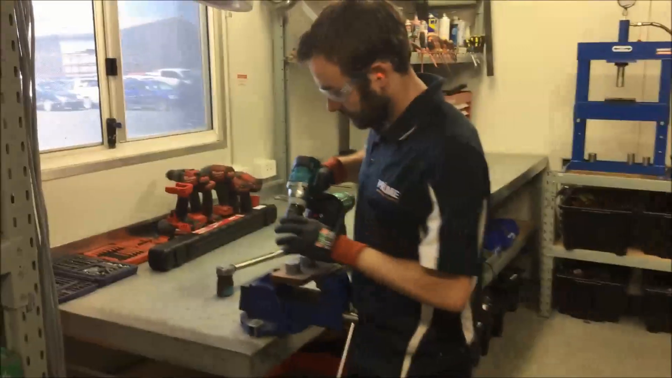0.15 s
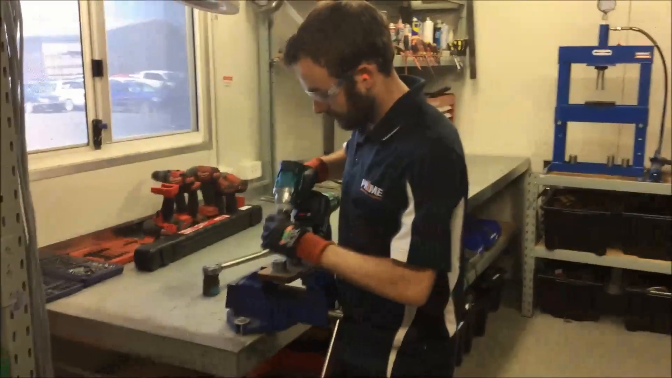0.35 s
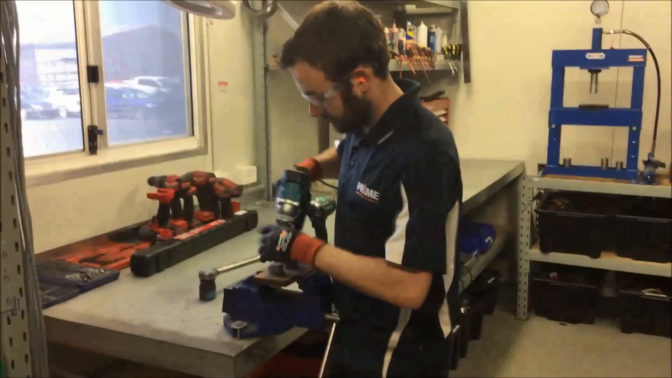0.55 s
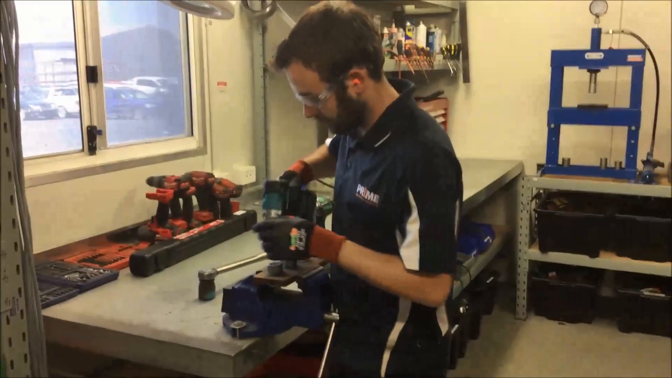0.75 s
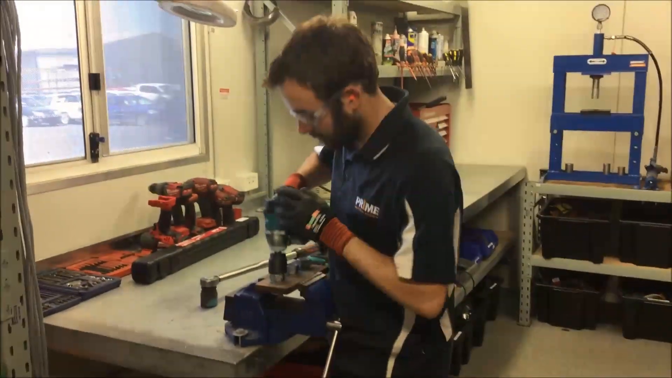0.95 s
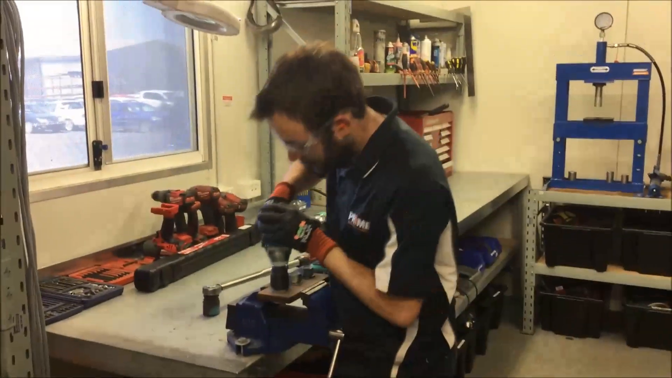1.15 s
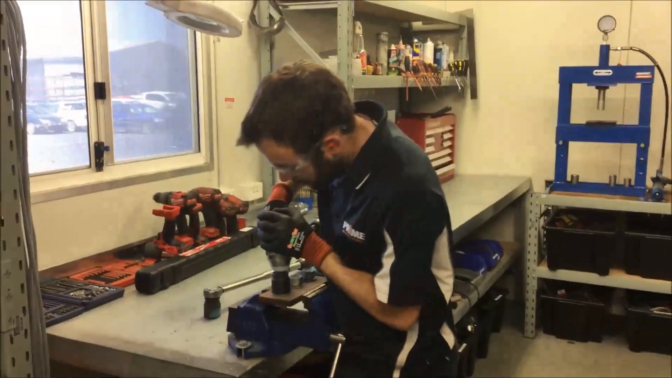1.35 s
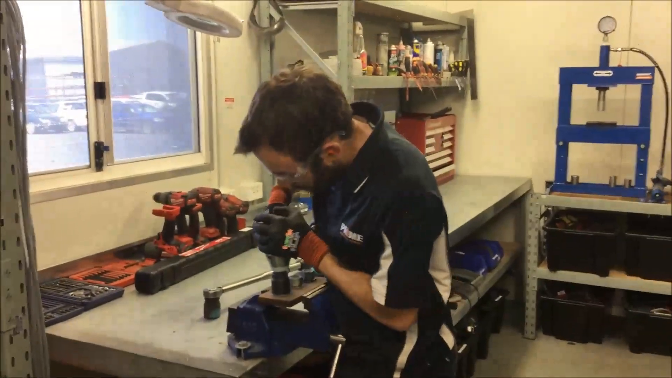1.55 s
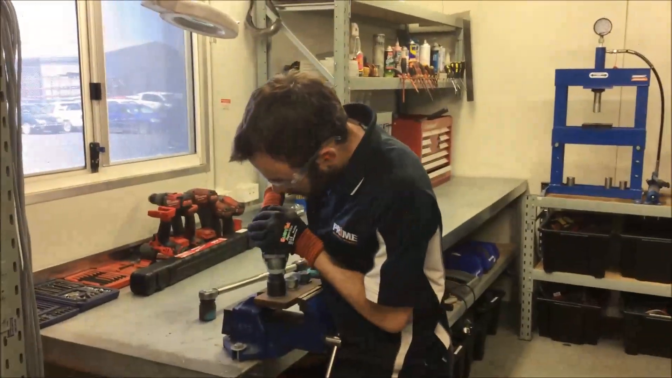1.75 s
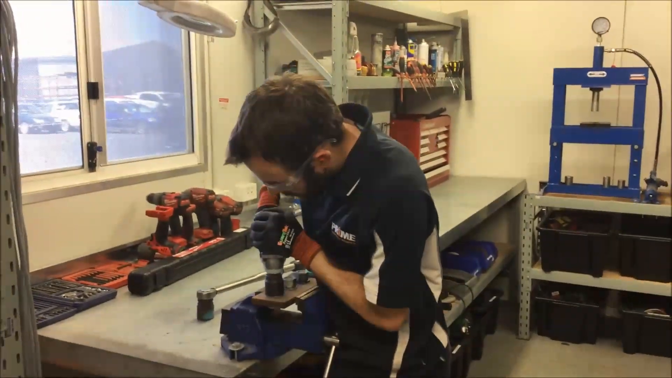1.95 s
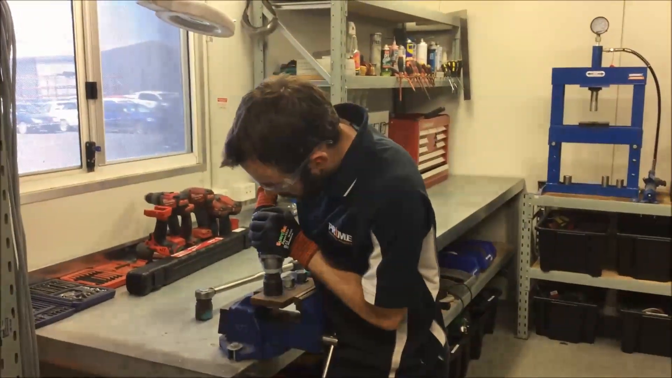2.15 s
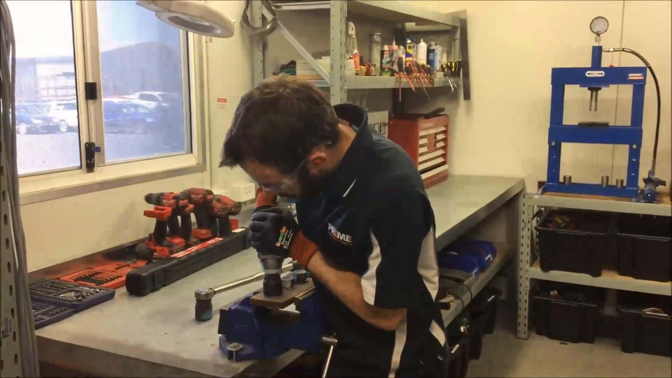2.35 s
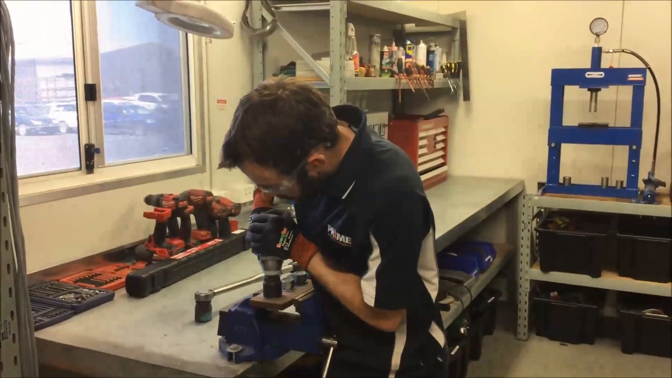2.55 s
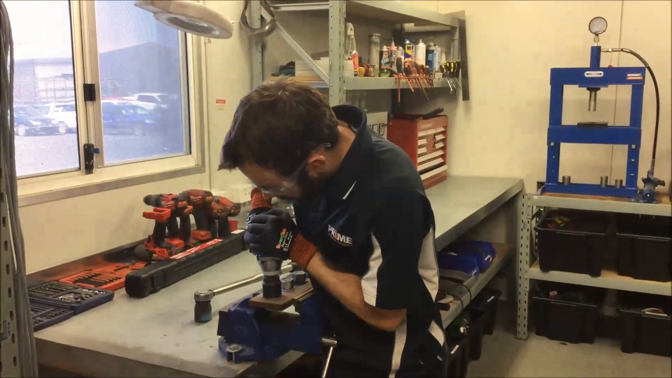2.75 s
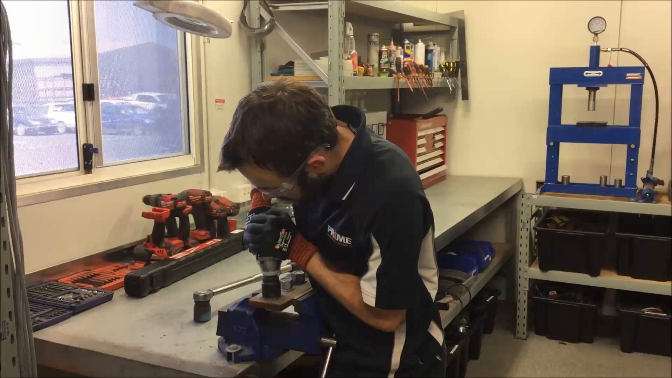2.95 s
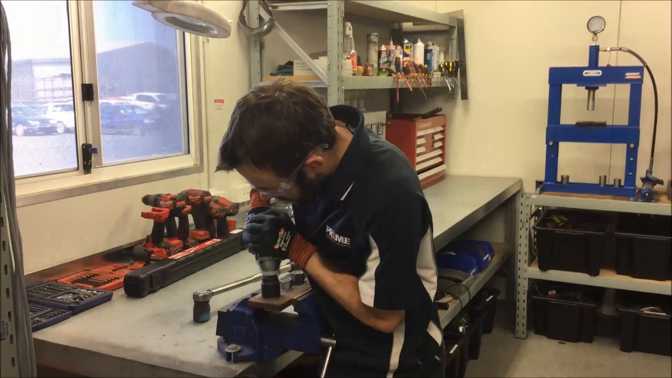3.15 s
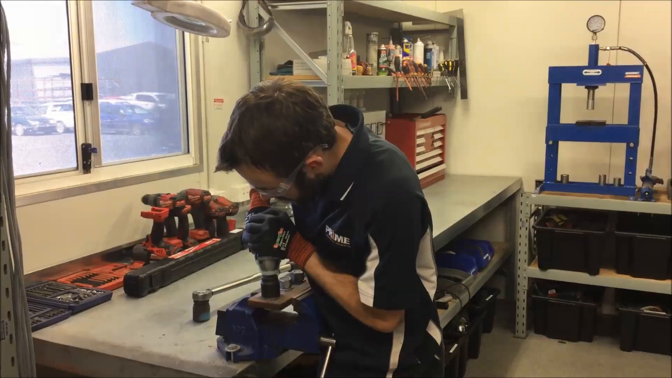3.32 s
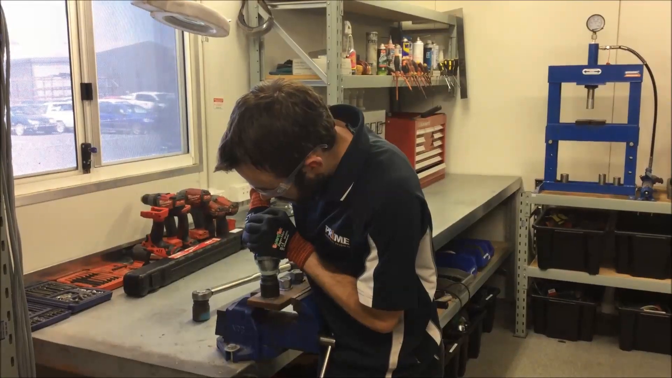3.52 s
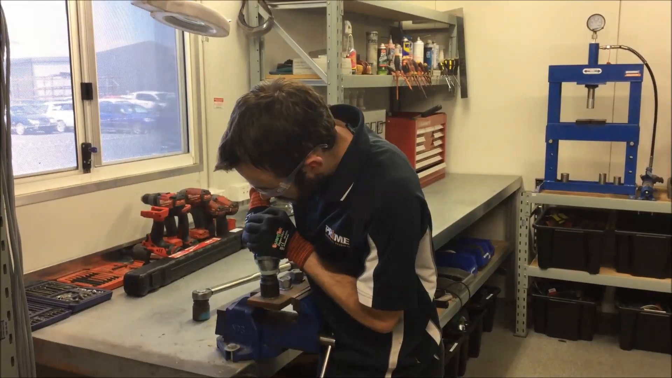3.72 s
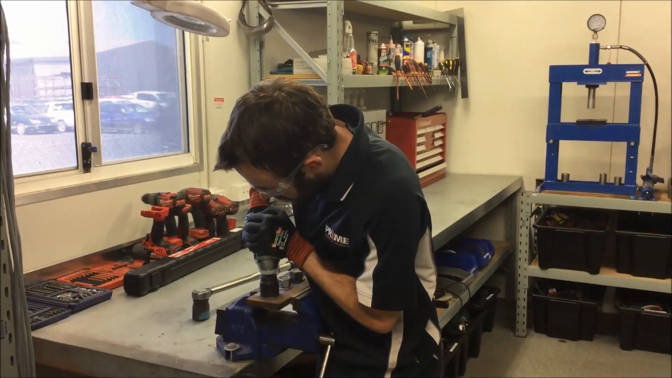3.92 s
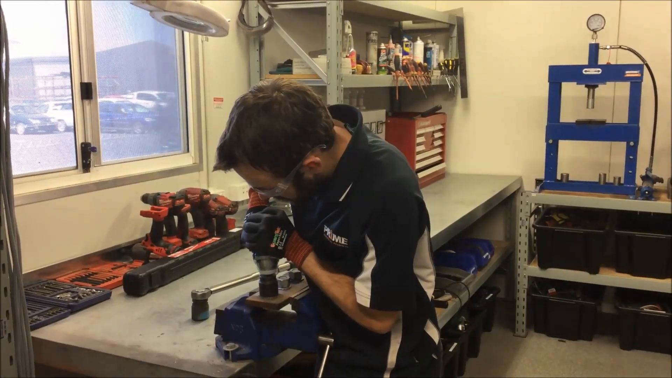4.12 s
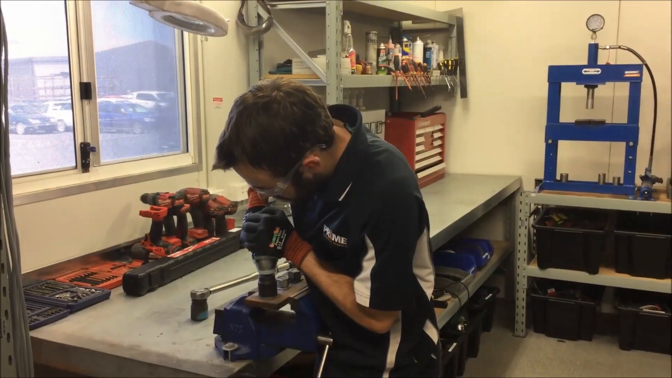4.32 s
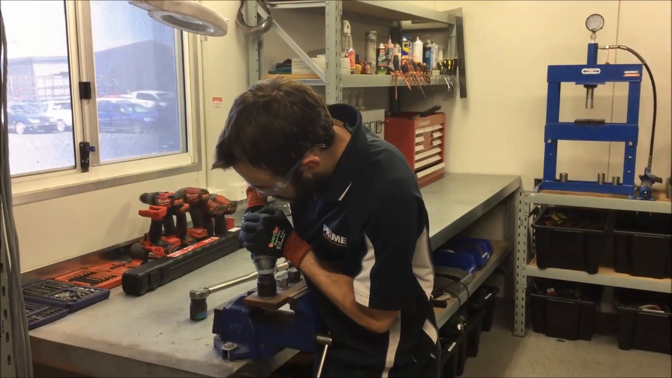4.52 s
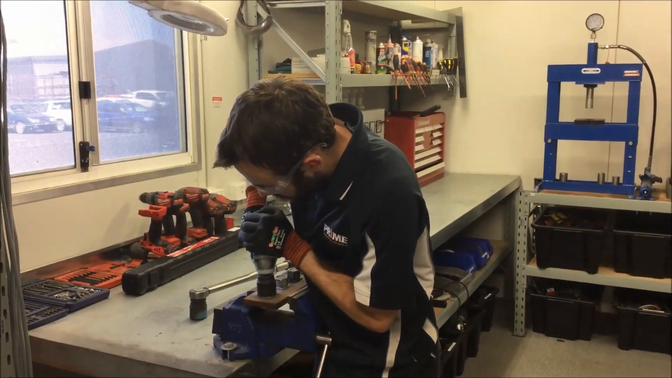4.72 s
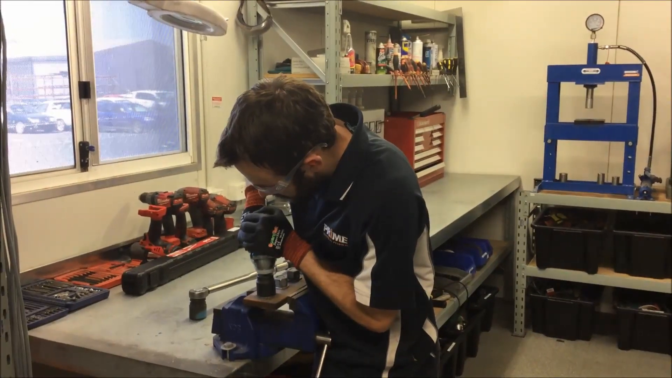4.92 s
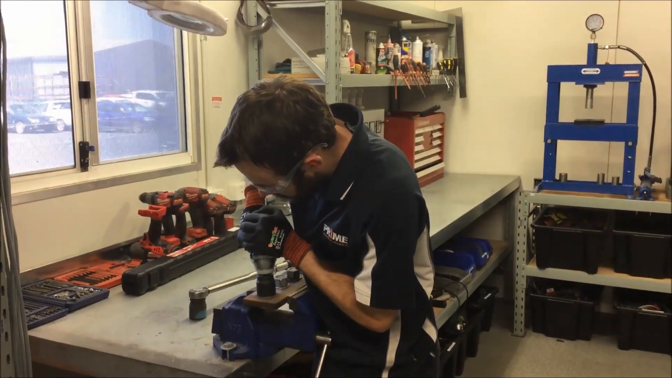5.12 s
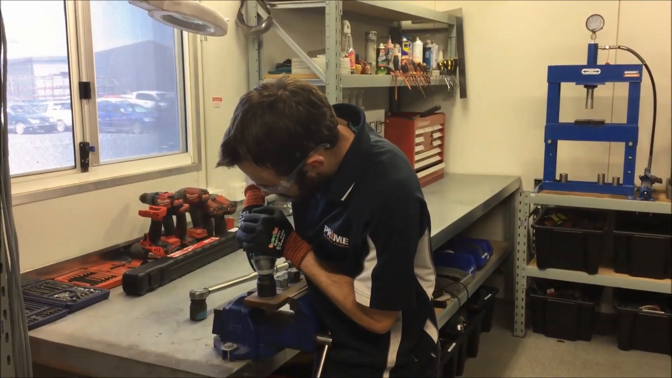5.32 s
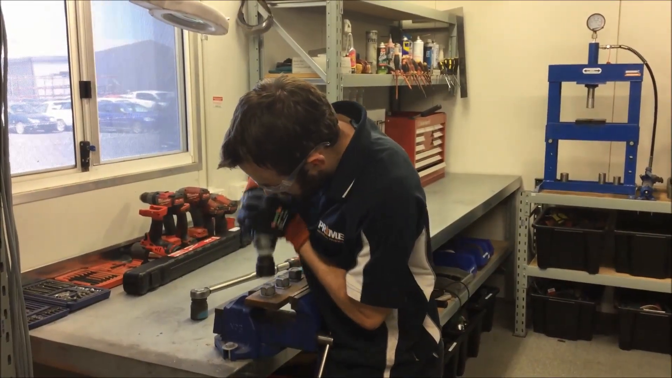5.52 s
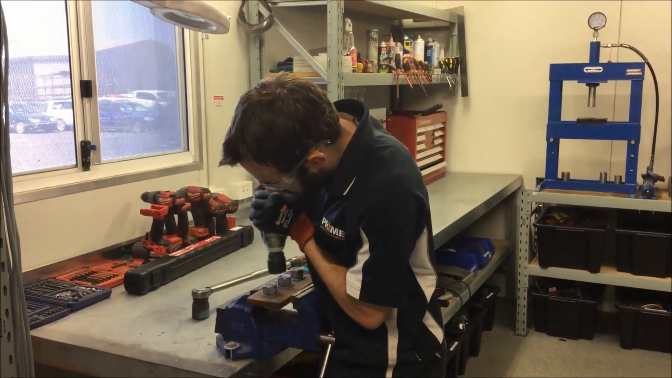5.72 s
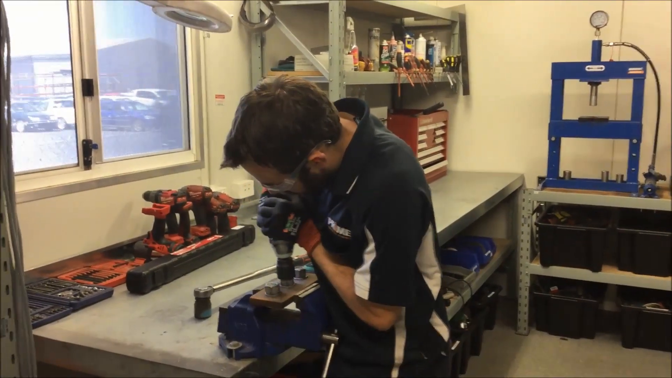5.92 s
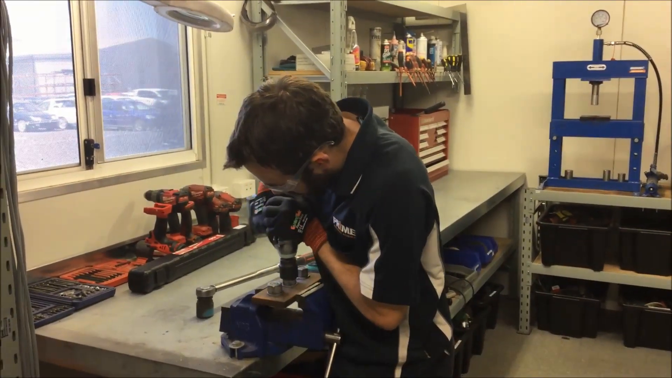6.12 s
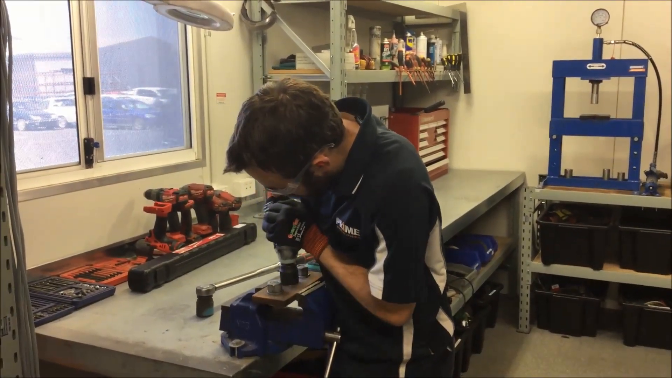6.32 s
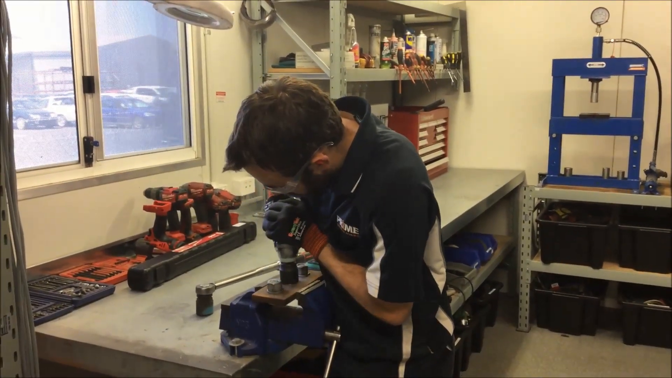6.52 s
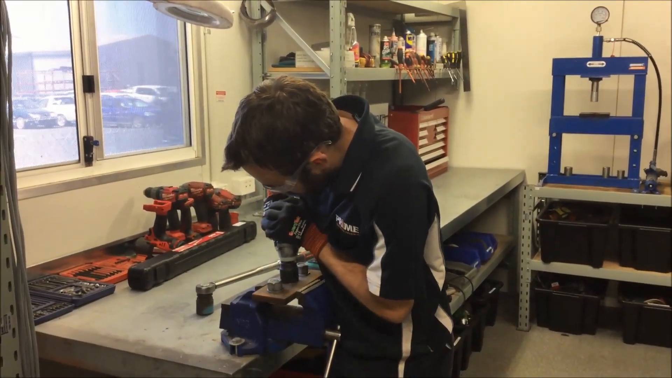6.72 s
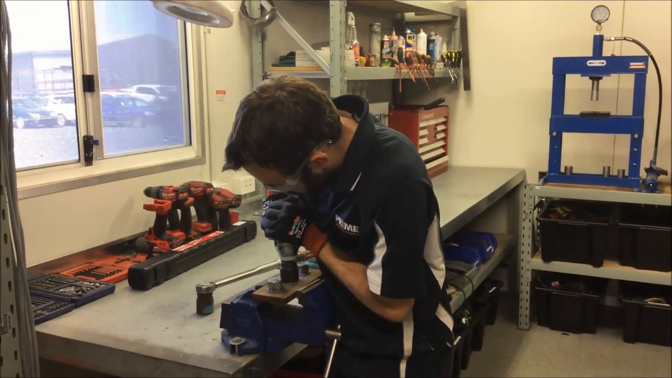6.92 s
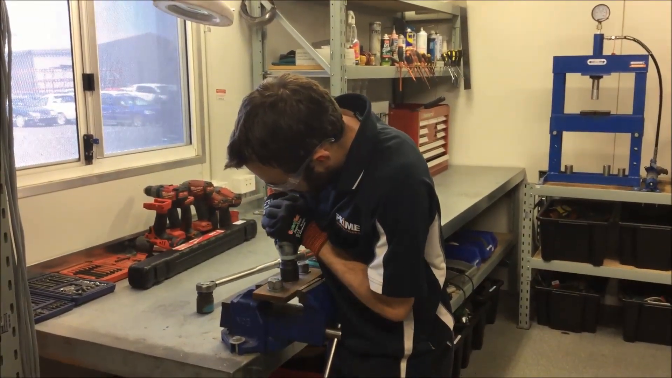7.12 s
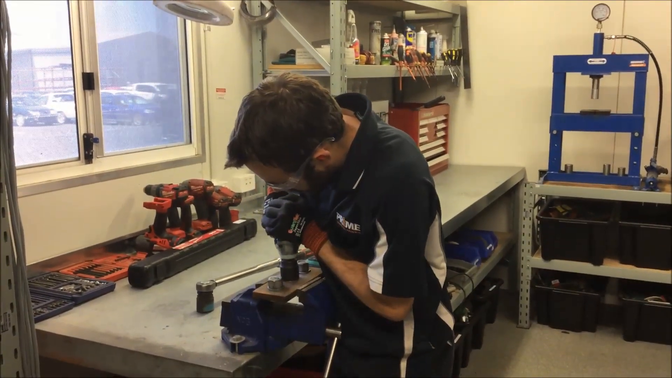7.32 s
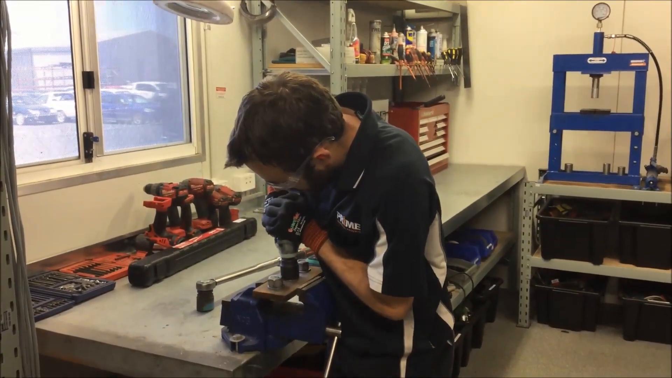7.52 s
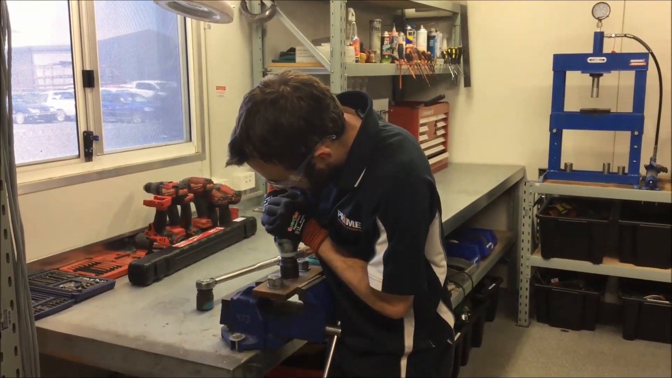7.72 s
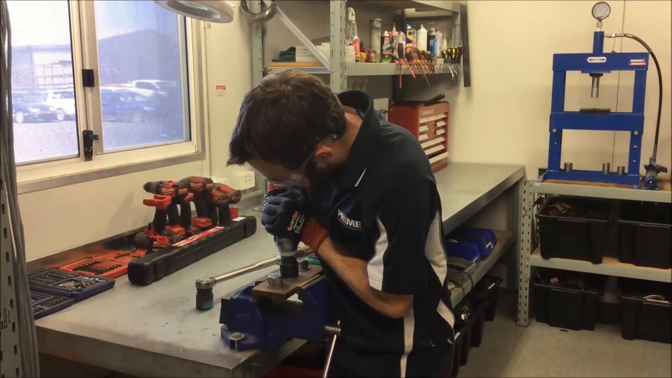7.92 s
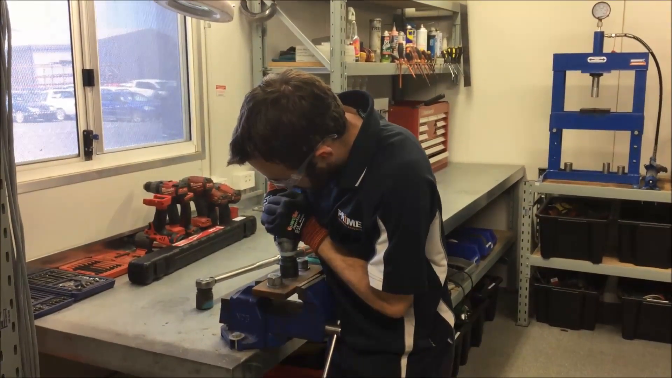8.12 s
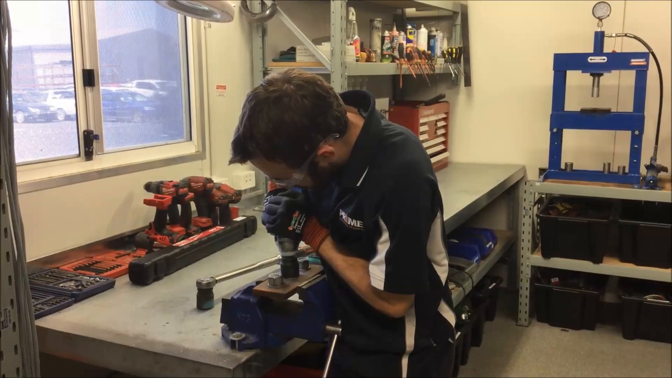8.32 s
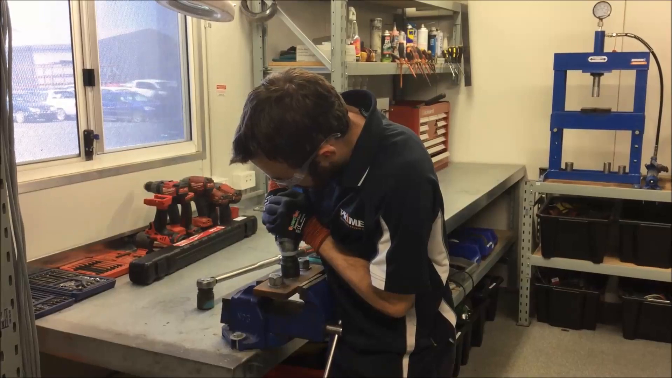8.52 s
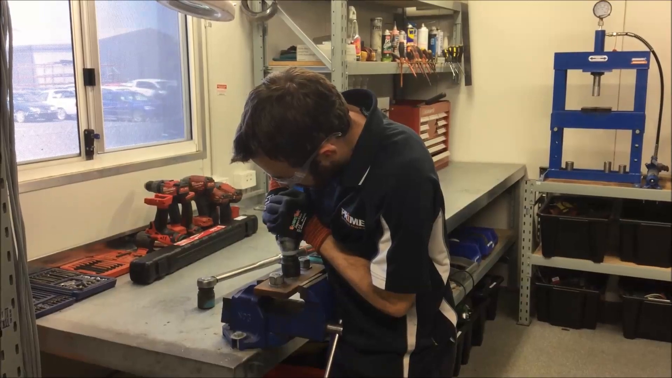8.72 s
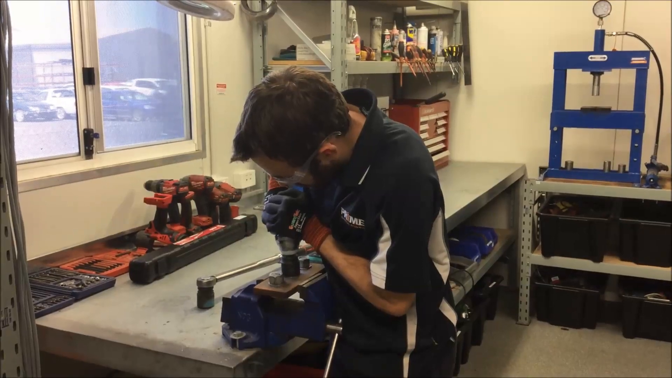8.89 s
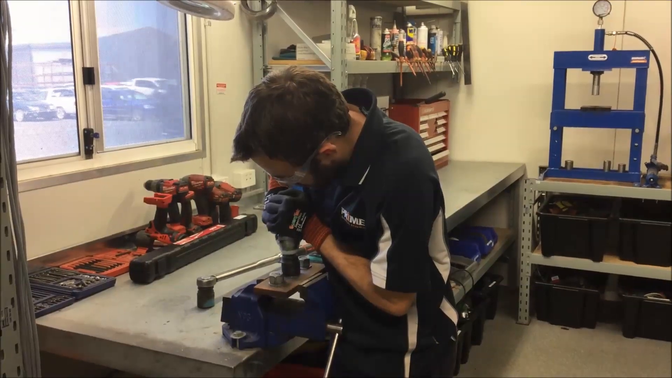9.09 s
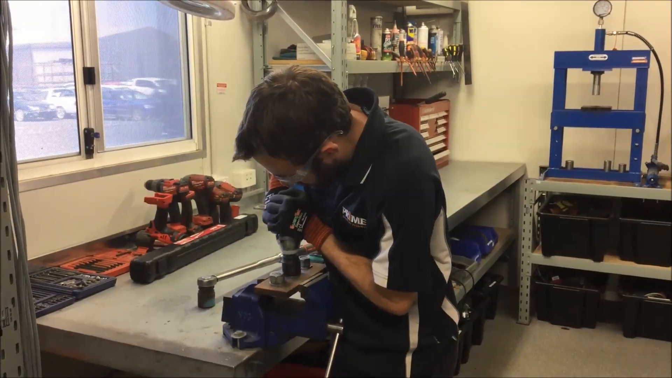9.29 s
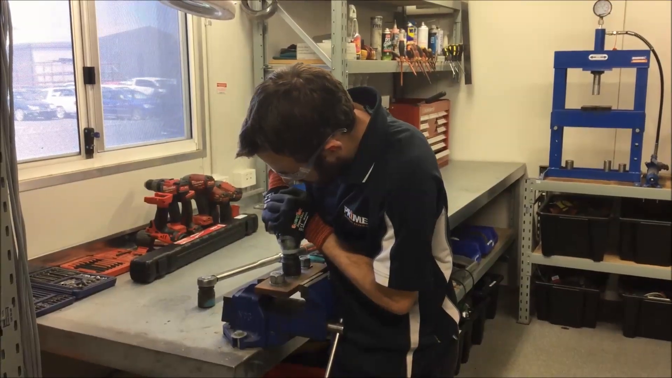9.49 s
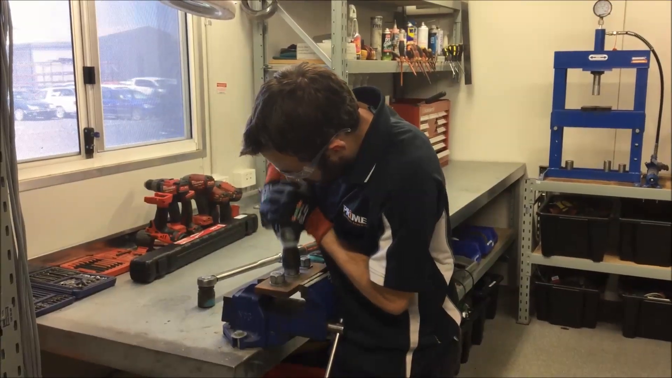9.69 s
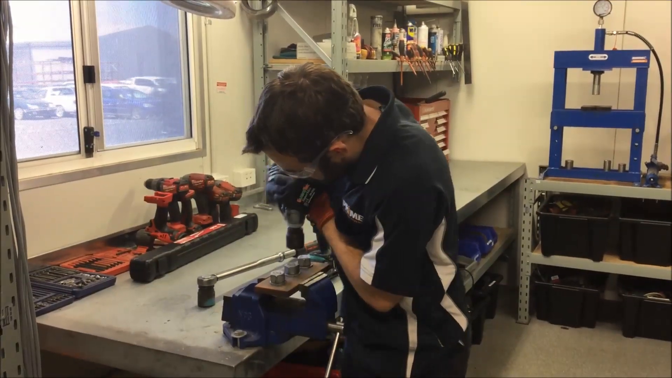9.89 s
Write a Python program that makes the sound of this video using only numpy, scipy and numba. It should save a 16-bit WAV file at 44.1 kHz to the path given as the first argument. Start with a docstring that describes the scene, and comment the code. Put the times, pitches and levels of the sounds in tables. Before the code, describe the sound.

A cordless impact wrench tightens two nuts on a steel plate, one after the other. Each run starts with light socket clanks, a trigger click and a very brief motor whirr, then becomes loud, rapid metallic hammering that makes the microphone throb. Faint rubbing of steel and a low ventilation hum fill the pauses, and the hard walls of the small workshop add a short echo.

```python
"""A small hard-walled workshop, where a cordless impact wrench tightens two nuts on a steel plate in a vice.
Over the ventilation hum, glove and socket scuff, rubbed steel sings and the socket seats with small clanks.
Each run opens with a trigger click and a motor whirr; then the hammer strikes the anvil about 61 times
a second. Socket, nut and plate ring, and the blows overload the microphone into a low throb."""
import sys
import numpy as np
from scipy import signal
from scipy.fft import rfft, irfft
from scipy.io import wavfile
from scipy.ndimage import uniform_filter1d
from numba import njit

SR = 44100
rng = np.random.default_rng(int(sys.argv[2]) if len(sys.argv) > 2 else 0)


def dump(signal):
    """Clip the signal to [-1, 1] and save it as 16-bit WAV at the path in sys.argv[1]."""
    limited = np.clip(np.atleast_2d(signal).T, -1, 1)
    pcm = np.round(limited * 32767).astype(np.int16)
    wavfile.write(sys.argv[1], SR, pcm)


N = 438794
T = np.arange(N) / SR

# The rush of the ventilation. Each row: frequency in Hz, relative level in dB.
AIR_COLOUR = [(20, -32), (32, -13.5), (45, -1), (70, -10), (120, -9.5), (180, -17), (260, -23),
              (360, -27.5), (480, -38.5), (700, -35.5), (950, -46), (1250, -40), (1700, -53), (5000, -61.5),
              (15000, -65.5)]
# The fan's hum. Each row: pitch in Hz, level in dB.
FAN_TONES = [(43.5, -51), (86, -59.5), (175, -63.5), (231.5, -63.5)]
# Lightly rubbed steel. Each row: middle in seconds, half length in seconds, pitch in Hz, level in dB.
RUB_TONES = [(0.13, 0.14, 3600, -73), (0.1, 0.12, 3290, -77), (.12, .08, 5303, -83), (0.12, .14, 6772, -82),
             (2.37, 0.17, 1245, -73.5), (5.85, .16, 1500, -64), (4.2, .16, 1400, -66.5),
             (5.1, 0.11, 1500, -74), (6.3, .16, 3600, -74), (6.33, 0.15, 6400, -72)]
# Glove and socket sliding on the tool. Each row: middle in seconds, half length in seconds, level in dB.
SLIDES = [(0.235, 0.076, -68.5), (.48, 0.064, -71), (0.56, 0.043, -61.5)]
# The tone of a slide. Each row: frequency in Hz, relative level in dB.
SCUFF_COLOUR = [(300, -22), (1000, -12), (1450, 5), (2400, -2), (3700, -4), (6000, -14), (9000, -24),
                (15000, -35)]
# Socket clanks, the trigger's clicks and the hammer's first light blow. Each row: time in seconds,
# relative level in dB, bench thud send in dB, bright edge send in dB, seconds for the rattle to fall
# 30 dB, ring pitch in Hz.
SMALL_HITS = [(0.448, -64, -15, -10, .02, 2500), (0.608, -66, -15, -5, 0.012, 2500),
              (1.018, -37.5, -2, 4.5, 0.015, 1320), (1.031, -34.5, -21, -15, 0.031, 1550),
              (1.283, -38, -8, -3, 0.025, 1395), (1.305, -46.5, 17, -35, 0.033, 1240),
              (1.761, -45, -10.5, -22, .04, 713), (2.55, -50, -17.5, 3.5, 0.016, 3300),
              (2.586, -31.5, -17.5, 24, 0.017, 1386), (5.934, -35, -1, -3.5, 0.022, 1087),
              (6.321, -29.5, 6.5, -11, 0.034, 1087), (6.65, -53, -5, 0, .025, 3300)]
# The tone of a clank. Each row: frequency in Hz, relative level in dB.
CLANK_COLOUR = [(35, -39.5), (100, -14), (340, 4), (520, -6), (750, 0.5), (900, -22), (1100, 0),
                (1550, -8.5), (2000, -9.5), (2700, -10.5), (4000, -14), (6000, -25), (9000, -40),
                (15000, -35)]
# The plate ringing in a clank. Each row: pitch in Hz, 60 dB decay in seconds, gain in dB.
PLATE_MODES = [(1087, 0.05, -11), (2500, 0.022, -16.5), (3000, .1, -24.5), (3430, .06, -28)]
# The bench under the vice. Each row: pitch in Hz, 60 dB decay in seconds, gain in dB.
BENCH_MODES = [(125, 0.089, -6.5), (195, 0.032, -7), (330, 0.03, -4.5)]
# The workshop's reverb tail. Each row: band centre in Hz, 60 dB decay in seconds.
ROOM_DECAY = [(100, 1), (500, 0.36), (1200, 0.71), (3000, 0.62), (6000, 0.68), (10000, 0.44), (15000, 0.34)]
# One run per nut. Each row: hammer start and stop in seconds, seating time in seconds, tightening time
# scale in seconds, blows per second when tight, stumble when tight from 0 to 1, throb fade-in in seconds,
# spin-up level in dB.
WRENCH_RUNS = [(2.603, 5.34, .55, .6, 61.26, .38, 0.081, -25),
               (6.697, 9.605, 0.94, .72, 60.74, .6, 0.002, -23)]
# The broad tone of one blow. Each row: frequency in Hz, relative level in dB.
CRACK_COLOUR = [(60, -25.5), (250, 2.5), (600, 4), (1000, -1.5), (1800, -1), (2600, 0), (4100, -6.5),
                (5800, -3.5), (7300, -11), (8700, -5.5), (10200, -8.5), (11600, -6), (13000, -9),
                (15300, -8.5)]
# Socket, nut and plate under the hammer. Each row: pitch in Hz, 60 dB decay in seconds, then gains in dB
# for the first nut loose and seated, and for the second nut loose and seated.
STEEL_MODES = [(1050, 0.054, -17.5, -18.5, -40, -25.5), (1370, 0.071, -17, -22, -20, -17.5),
               (1433, 0.12, -9, -23, -17.5, -21.5), (1757, 0.014, -15.5, -27.5, -28, -20.5),
               (2150.8, .06, -27, -25.5, -36, -27), (2482, 0.02, -22.5, -22, -12, -14.5),
               (2750, 0.013, -13, -12.5, -29, -34), (3157, 0.034, -13, -13.5, -13.5, -16.5),
               (3670, 0.022, -15.5, -14, -15.5, -25), (4580, 0.052, -32, -32.5, -19, -28),
               (4640, 0.021, -28.5, -25.5, -22.5, -20), (4730, 0.05, -26.5, -24.5, -33, -34),
               (5180, 0.045, -20, -28.5, -27, -26), (5910, 0.014, -29, -28, -18, -20.5),
               (7960, 0.061, -38.5, -34, -20, -22.5), (11090, 0.042, -12.5, -12, -16, -11)]
# The fader ride of the deep throb, one list per run. Each row: time in seconds, relative level in dB.
THROB_RIDES = [
    [(2.68, -10), (2.87, -17), (3.1, -12), (3.5, -10), (4.0, -11.5), (4.25, -15.5), (4.65, -14.5),
     (4.9, -11.5), (5.2, -20)],
    [(6.72, -9), (6.92, -18.5), (7.2, -9), (7.7, -17.5), (8.12, -9.5), (8.3, -16.5), (8.55, -10),
     (8.74, -19), (9.0, -7.5), (9.3, -14.5), (9.55, -10.5)],
]
# The tone of the microphone's throb. Each row: frequency in Hz, relative level in dB.
THROB_COLOUR = [(20, -27), (40, -15), (65, 1.5), (125, -0.5), (200, -3.5), (320, -9.5), (600, -20.5),
                (1200, -30), (4000, -55.5)]

FREE_HZ, LOOSE_DB = 62.85, -13  # rate and force of the blows on a loose nut
HARDEN_POWER, TIGHT_RISE_DB, CREEP_DB_PER_S = 3.2, 2.06, 0.24  # blows harden late, then creep up
LET_GO_S, LET_GO_DB = 0.034, -2.5  # the last blows weaken as the trigger is let go
JOLT_STRAIN, JOLT_S = 1.1, 0.29  # the socket's first bite; a tight nut has a strain of 1


def undb(db):
    """Decibels to gain."""
    return 10 ** (np.asarray(db) / 20)


def on_log_axis(hz, points):
    """Read (Hz, value) points at the given frequencies."""
    f, value = np.transpose(points)
    return np.interp(np.log(hz + 1), np.log(f), value)


def unit(x):
    """Scale a response to unit energy."""
    return x / np.sqrt(np.sum(x ** 2))


def through(x, response):
    """Pass a sound through an impulse response."""
    return signal.oaconvolve(x, response)[:N]


def colour(points, size=8192):
    """Minimum-phase EQ shaped by (Hz, dB) points, with unit energy."""
    cepstrum = irfft(np.log(undb(on_log_axis(np.fft.rfftfreq(size, 1 / SR), points))))
    cepstrum[1:size // 2] *= 2
    cepstrum[size // 2 + 1:] = 0
    return unit(irfft(np.exp(rfft(cepstrum))))


def fade(t60):
    """Exponential decay down to -60 dB."""
    return undb(-60 * T[:int(t60 * SR) + 2] / t60)


def bell(middle_s, half_s):
    """A smooth swell up to 1 and back down."""
    return np.exp(-((T - middle_s) / half_s) ** 2)


def mode(hz, t60):
    """Ring of one mode, with unit energy."""
    decay = fade(t60)
    return unit(decay * np.sin(2 * np.pi * hz * T[:len(decay)]))


def burst(pulses, t60):
    """Fresh noise after each pulse, with the energy of that pulse."""
    power = through(pulses ** 2, unit(fade(t60)) ** 2)
    return np.sqrt(np.maximum(power, 0)) * rng.standard_normal(N)


def pulses_at(times, sizes):
    """Single-sample pushes at the given times."""
    return np.bincount(np.clip(np.asarray(times) * SR, 0, N - 1).astype(int), sizes, N)


def walk(rate_hz):
    """Slow random modulation with a spread near 1."""
    return np.interp(T * rate_hz, np.arange(1024), rng.standard_normal(1024))


@njit
def follow(x, attack, release):
    """Envelope follower with separate rise and fall speeds."""
    out, level = np.empty(len(x)), 0.
    for i in range(len(x)):
        level += (x[i] - level) * (attack if x[i] > level else release)
        out[i] = level
    return out


def ventilation(air_db=-49, waver_db=2.5, drift=0.024):
    """A low rush of air under a fan hum that wavers in level and pitch."""
    air = through(rng.standard_normal(N), colour(AIR_COLOUR)) * undb(air_db + walk(3.3))
    hum = 0
    for hz, db in FAN_TONES:
        level = undb(db + waver_db * walk(6.2))
        hum += level * np.sin(2 * np.pi * hz * np.cumsum(1 + drift * walk(8.4)) / SR)
    return air + np.sqrt(2) * hum


def rubbed_steel(flutter_hz=24):
    """Socket and plate sing faintly and unsteadily as they slide on each other."""
    out = 0
    for middle_s, half_s, hz, db in RUB_TONES:
        phase = 2 * np.pi * hz * T
        tone = walk(flutter_hz) * np.sin(phase) + walk(flutter_hz) * np.cos(phase)
        out += undb(db) * bell(middle_s, half_s) * tone
    return out


def scuffs(grip_db=3, grip_hz=90):
    """Glove and socket slide on the tool, catching and slipping as they go."""
    swell = sum(undb(db) * bell(middle_s, half_s) for middle_s, half_s, db in SLIDES)
    grip = undb(grip_db * walk(grip_hz))
    return through(swell * grip * rng.standard_normal(N), colour(SCUFF_COLOUR))


def clanks_and_clicks(size_db=27, edge_hz=7000, edge_db=-7, touch_s=0.01, grain_db=3,
                      ring_db=-5, ring_t60=0.031):
    """Socket clanks, trigger clicks and the hammer's first light blow: each a ring, thud and bright edge."""
    hits, to_bench, to_edge, ring = np.zeros((4, N))
    for time_s, db, thud_db, bright_db, rattle_s, ring_hz in SMALL_HITS:
        decay = fade(2 * rattle_s)
        rattle = unit(decay * np.minimum(T[:len(decay)] / touch_s, 1))
        grains = rng.standard_normal(SR) * undb(grain_db * rng.standard_normal(SR))
        start = int((time_s - touch_s / 2) * SR)
        hit = np.zeros(N)
        hit[start:start + len(rattle)] = undb(db + size_db) * rattle * grains[:len(rattle)]
        hits += hit
        to_bench += undb(thud_db) * hit
        to_edge += undb(bright_db) * hit
        ring += undb(ring_db) * through(hit, mode(ring_hz, ring_t60))
    plate = sum(undb(db) * through(hits, mode(hz, t60)) for hz, t60, db in PLATE_MODES)
    thud = sum(undb(db) * through(to_bench, mode(hz, t60)) for hz, t60, db in BENCH_MODES)
    edge = undb(edge_db) * through(to_edge, mode(edge_hz, t60=0.00018))
    return through(hits, colour(CLANK_COLOUR)) + ring + plate + thud + edge


def echoes(early_db=-7, early_t60=0.072, tail_db=-5.0, gap_s=.004):
    """Room response: quick slaps off bench and wall, then a tail in which the bass lasts longest."""
    t = T[:SR]
    hz = np.fft.rfftfreq(SR, 1 / SR)
    spectrum, tail = rfft(rng.standard_normal(SR)), 0
    for centre, t60 in ROOM_DECAY:
        band = on_log_axis(hz, [(f, float(f == centre)) for f, _ in ROOM_DECAY])
        tail += irfft(spectrum * band) * undb(-60 * t / t60)
    early = rng.standard_normal(SR) ** 3 * undb(-60 * t / early_t60)  # cubing makes the noise spiky
    return undb(tail_db) * unit(tail * (t > gap_s)) + undb(early_db) * unit(early * (t > gap_s))


def workshop(x, sway_hz=14, count=7):
    """The reverb return; the echo paths shift as the tool shakes and turns."""
    paths = np.array([walk(sway_hz) for _ in range(count)])
    paths /= np.sqrt(np.sum(paths ** 2, axis=0))
    return sum(through(x * share, echoes()) for share in paths)


def spin_up(start_s, whirr_db, rise_s=0.01, mesh_hz=3200, mesh_db=-8):
    """Motor and gears race up for a few hundredths of a second until the hammer catches."""
    lead = np.minimum(T - start_s, 0)
    swell = np.exp(lead / rise_s) * (T < start_s)
    gear_hz = mesh_hz * np.exp(lead / (10 * rise_s))
    whine = undb(mesh_db) * np.sin(2 * np.pi * np.cumsum(gear_hz) / SR)
    whirr = through(rng.standard_normal(N), colour(CRACK_COLOUR))
    return undb(whirr_db) * swell * (whirr + whine)


def hammer(start_s, stop_s, tight, tight_hz, tight_stumble, jitter_s=.0007, scatter_db=3.5, limp_db=-.5):
    """Blow times and sizes: as the nut comes tight, the hammer slows and stumbles in time and force."""
    running = T >= start_s
    blow_count = np.cumsum((FREE_HZ + (tight_hz - FREE_HZ) * tight) * running) / SR
    last_blow = int(np.interp(stop_s, T, blow_count))
    times = np.interp(np.arange(last_blow + 1), blow_count[running], T[running])
    stumble = tight_stumble * np.interp(times, T, tight)
    late, strong, slip = rng.standard_normal((256, 3))[:len(times)].T
    limp = (-1.) ** np.cumsum(slip < 1)  # strong and weak in turn; a skipped jaw swaps the order
    sizes = undb(stumble * (scatter_db * strong + limp_db * limp))
    sizes /= np.sqrt(uniform_filter1d(sizes ** 2, size=9))  # even out the power over nine blows
    return times + jitter_s * (stumble + .2) * late, sizes * np.sqrt(SR / FREE_HZ)


def anvil_blows(nut, times, sizes, force_db, crack_t60=0.039, rebound_s=.0065, rebound_db=-7,
                tick_db=-8, crack_db=-2.0, wander_db=2):
    """Each blow and its rebound crack through the tool and ring steel whose tone shifts as the nut seats."""
    start_s, _, seat_s = WRENCH_RUNS[nut][:3]
    seated = np.clip(2 * (T - start_s) / seat_s - 1, 0, 1)
    rebounds = times + rebound_s * (1 + .25 * rng.standard_normal(256)[:len(times)])
    blows = (pulses_at(times, sizes) + undb(rebound_db) * pulses_at(rebounds, sizes)) * undb(force_db)
    crack = undb(tick_db) * blows + undb(crack_db) * burst(blows, crack_t60)
    out = through(crack, colour(CRACK_COLOUR))
    contact = burst(blows, t60=0.0035)  # the socket sits a little differently at every blow
    for hz, t60, *levels in STEEL_MODES:
        loose_db, seated_db = levels[2 * nut:2 * nut + 2]
        db = loose_db + (seated_db - loose_db) * seated + wander_db * walk(5)
        out += through(contact * undb(db), mode(hz, t60))
    return out


def throb(times, sizes, deep_db, strain, surge_db=2.5, scatter_db=3.0, push_hz=260, push_db=-6,
          split_hz=160, noise_t60=0.049, rumble_db=-4.0, flutter_db=-16.5, flutter_rise_db=4.5,
          cluck_hz=620, cluck_db=-34, cluck_rise_db=8, cluck_scatter_db=5):
    """Blows overload the microphone: thud and rumble surge; flutter and hollow clucks grow with strain."""
    push_luck, flutter_luck, cluck_luck = rng.standard_normal((256, 3))[:len(times)].T
    deep_sizes = sizes * undb(np.interp(times, T, deep_db + surge_db * walk(18)))
    pushes = pulses_at(times, deep_sizes * undb(scatter_db * push_luck))
    pushes = signal.lfilter(*signal.butter(2, push_hz, fs=SR), pushes)
    rumble = burst(pulses_at(times, deep_sizes), noise_t60)
    rumble = signal.lfilter(*signal.butter(2, split_hz, fs=SR), rumble)
    flutter = burst(pulses_at(times, sizes * undb(scatter_db * flutter_luck)), noise_t60)
    flutter = signal.lfilter(*signal.butter(2, split_hz, "high", fs=SR), flutter)
    flutter *= undb(flutter_db + flutter_rise_db * strain)
    clucks = burst(pulses_at(times, sizes * undb(cluck_scatter_db * cluck_luck)), t60=0.033)
    clucks *= undb(cluck_db + cluck_rise_db * strain)
    low_end = undb(push_db) * pushes + undb(rumble_db) * rumble + flutter
    return through(low_end, colour(THROB_COLOUR)) + through(clucks, mode(cluck_hz, t60=0.008))


def scene(overload_db=3.5, tool_direct_db=-3.5, handling_direct_db=-9):
    """The mix: two runs of the wrench, each shaped by how tight its nut is, with handling and room tone."""
    handling = clanks_and_clicks() + scuffs()
    tool, throbs = 0, 0
    for nut, run in enumerate(WRENCH_RUNS):
        start_s, stop_s, _, tighten_s, tight_hz, stumble, bite_s, whirr_db = run
        age = np.maximum(T - start_s, 0)
        tight = 1 - np.exp(-(age / tighten_s) ** 2)
        strain = tight ** HARDEN_POWER
        let_go = np.exp(np.minimum(T - stop_s, 0) / LET_GO_S)
        force_db = LOOSE_DB + TIGHT_RISE_DB * strain + CREEP_DB_PER_S * age + LET_GO_DB * let_go
        times, sizes = hammer(start_s, stop_s, tight, tight_hz, stumble)
        tool += spin_up(start_s, whirr_db) + anvil_blows(nut, times, sizes, force_db)
        bite = np.clip((times - start_s + 0.0019) / bite_s, 0, 1) ** 2  # throb enters as the socket bites
        jolt = JOLT_STRAIN * np.exp(-(age / JOLT_S) ** 2)
        ride_db = np.interp(T, *np.transpose(THROB_RIDES[nut]))
        throbs += throb(times, sizes * bite, ride_db + overload_db, strain + jolt)
    # the hands screen the small sounds
    direct = undb(tool_direct_db) * tool + undb(handling_direct_db) * handling
    return (direct + workshop(tool + handling) + rubbed_steel() + throbs + ventilation())[None]


def record(dry, threshold_db=-9, attack_s=0.055, release_s=0.4, squeeze=0.32, ceiling=.88,
           low_cut_hz=15, high_cut_hz=15300):
    """Low cut, a compressor that holds the runs down, a soft clip on the tallest peaks, then a high cut."""
    sound = signal.sosfilt(signal.butter(2, low_cut_hz, "high", fs=SR, output="sos"), dry)
    envelope = follow(np.abs(sound[0]), 1 / (attack_s * SR), 1 / (release_s * SR))
    held = sound * np.maximum(envelope / undb(threshold_db), 1) ** -squeeze
    rounded = held / (1 + (held / ceiling) ** 6) ** (1 / 6)
    return signal.sosfilt(signal.ellip(12, .2, 70, high_cut_hz, fs=SR, output="sos"), rounded)


dry = scene()
out = record(dry)
dump(out)
```